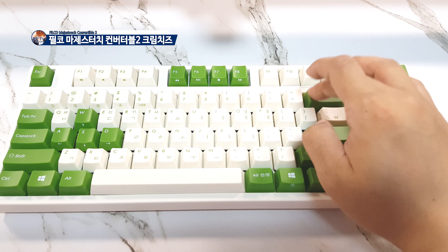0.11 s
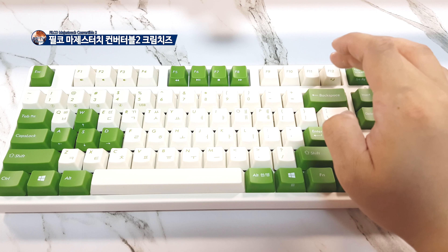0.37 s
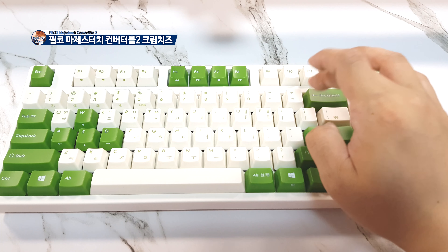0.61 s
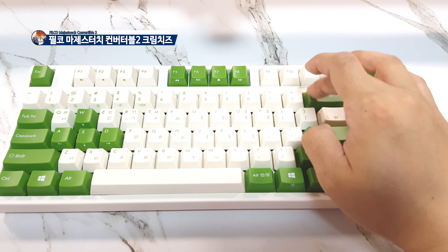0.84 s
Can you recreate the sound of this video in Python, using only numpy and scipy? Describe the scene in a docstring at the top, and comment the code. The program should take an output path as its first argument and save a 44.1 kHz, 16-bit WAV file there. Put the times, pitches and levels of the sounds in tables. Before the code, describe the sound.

Evenly spaced single mechanical key presses clack and spring back over a hollow case, switching to a sharper-sounding key after a short gap.

```python
"""In a quiet humming room, one finger taps a wide key of a mechanical keyboard about five times a second,
then moves to another wide key. Each stroke is a fingertip touch, a hard bottom-out and a spring-back clack,
with rubbing and loose rattles while the key is held. Contacts are shaped noise ringing cap and stem resonances;
blows ring decaying modes of the hollow case and of the desk, which shakes the phone standing on it."""
import sys
import numpy as np
from scipy import signal
from scipy.fft import rfft, irfft
from scipy.io import wavfile

SR = 44100
rng = np.random.default_rng(int(sys.argv[2]) if len(sys.argv) > 2 else 0)


def pcm_store(signal):
    """Save signal as 16-bit PCM."""
    levels = np.round(np.clip(np.atleast_2d(signal), -1, 1) * 32767)
    wavfile.write(sys.argv[1], SR, levels.astype(np.int16).T)


def volts_from_decibels(level):
    """Turn decibel levels (scalar or array-like) into linear amplitude factors."""
    exponent = np.asarray(level, float) / 20
    return 10 ** exponent


N = 304731
SECOND_KEY_S = 3.2  # strokes after this time fall on the second key


def key_of(s):
    """Source position: 0 for strokes on the first key, 1 for the second."""
    return (np.asarray(s) > SECOND_KEY_S).astype(int)


def fade(t, t60):
    """Exponential decay: the level falls by 60 dB in t60 seconds."""
    return np.exp(-np.log(1000) * t / t60)


def resonate(x, peaks):
    """Resonance: two-pole bands (frequency [Hz], width [Hz], level [dB]) summed with alternating sign."""
    f = np.fft.rfftfreq(x.shape[-1], 1 / SR) + 1e-3
    response = 0
    for k, (hz, width, db) in enumerate(peaks):
        response = response + (-1) ** k * volts_from_decibels(db) / (1 + 1j * (f * f - hz * hz) / (f * width))
    return irfft(rfft(x) * response, x.shape[-1])


def add(out, x, s):
    """Superposition: mix x into out from time s."""
    i = int(s * SR)
    x = x[..., max(-i, 0):N - i]
    out[..., max(i, 0):max(i, 0) + x.shape[-1]] += x


# background spectrum in mid: (frequency [Hz], relative density [dB per Hz])
HUM_SPECTRUM = [(25, 16.5), (45, 4.5), (92, 0), (150, 2.5), (250, 5.5), (290, 10), (373, 0.5), (463, 2.5),
                (600, -3), (1200, -6), (2100, -12.5), (2750, -20), (5500, -29), (16000, -32.5)]
# spread of the background: (frequency [Hz], side minus mid [dB])
HUM_SIDE = [(60, -2.5), (200, -7), (1300, -6.5), (4400, -3), (15000, 2.5)]


def hum():
    """Stationary noise: the room's steady background and the microphone's hiss, as filtered white noise."""
    log_f = np.log(np.fft.rfftfreq(N, 1 / SR) + 1)
    mid_hz, mid_db = np.transpose(HUM_SPECTRUM)
    side_hz, side_db = np.transpose(HUM_SIDE)
    mid_db = np.interp(log_f, np.log(mid_hz), mid_db)
    side_db = mid_db + np.interp(log_f, np.log(side_hz), side_db)
    noise = irfft(rfft(rng.standard_normal((2, N))) * volts_from_decibels([mid_db, side_db]), N)
    return noise * volts_from_decibels(-51) / noise[0].std()  # rms of mid


def grit(shape, rough_db):
    """Asperity contact: noise whose size jumps every half millisecond, as from many tiny contacts."""
    size = np.repeat(rng.standard_normal(shape[-1] // 24 + 1), 24)[:shape[-1]]
    return rng.standard_normal(shape) * volts_from_decibels(rough_db * size)


# cap resonances, one list per key:
# (frequency [Hz], width [Hz], level on a press [dB], level on other contacts [dB])
CAPS = [
    [(1868, 124, 0.5, 5), (3082, 363, 3.5, 8.5), (3240, 710, 1.5, 5), (4470, 840, -9, -3.5)],
    [(1708, 406, 1.5, 11), (2046, 1230, -6, -1), (2804, 384, -5, 7.5), (3720, 904, -13, 3.5),
     (4630, 820, -13, -1)],
]
# stem resonances, the treble: (frequency [Hz], width [Hz], level on first key [dB], on second key [dB])
STEM = [(5870, 3200, -13, -3), (8120, 930, -5.5, 0.5), (9470, 1250, -5.5, 0.5), (13530, 3600, -5.5, -13),
        (14900, 8400, -11.5, -27)]


def contact(s, push, column, peak_db, treble_db, rough_db=1.0):
    """Forced resonance: noise shaped by push rings the cap and stem of the key in use; mid and side."""
    key = int(key_of(s))
    noise = grit((4, len(push)), rough_db) * push
    # the finger damps and detunes the cap differently each time
    detune, colour_db = 1 + 0.042 * rng.standard_normal(5), 1.1 * rng.standard_normal(5)
    cap_peaks = [(c[0] * d, c[1], c[column] + e) for c, d, e in zip(CAPS[key], detune, colour_db)]
    cap = resonate(noise[:2], cap_peaks)
    stem = resonate(noise[2:], [(c[0], c[1], c[2 + key]) for c in STEM])
    cap = cap / np.abs(cap[0]).max()
    stem = volts_from_decibels(treble_db) * stem / np.abs(stem[0]).max()
    # the key sits nearer the left port; the treble reaches the ports less alike
    mid = cap[0] + stem[0]
    unlike_treble = signal.lfilter([1, -.7], 1, stem[1])
    side = 0.24 * cap[0] + 0.21 * cap[1] + .07 * stem[0] + 0.48 * unlike_treble
    return volts_from_decibels(peak_db) * np.array([mid, side])


def follow(events, column, law):
    """Proportionality: a level follows one column of the events by a straight law, offset by key."""
    rows = np.array(events, float)
    usual_db = -30  # the cause at which the law's offsets hold
    return np.where(key_of(rows[:, 0]) == 1, law[1], law[0]) + law[2] * (rows[:, column] - usual_db)


def bright(events, column, law):
    """Spectral tilt with force: rows (time [s], cap peak [dB], treble [dB]), the treble by law and chance."""
    treble_db = follow(events, column, law) + 1.5 * rng.standard_normal(len(events))
    return np.c_[np.array(events)[:, :2], treble_db]


def clicks(events, column, rise_s, crack_s, abrupt, tail_db, tail_s, swell_db, swell_s):
    """Impact: a crack, its length set by key, with a rattling tail; a faint noise swells just before it."""
    out, lead_s = np.zeros((2, N)), .024
    t = np.arange(8192) / SR - lead_s
    after = np.maximum(t, 0)
    for s, peak_db, treble_db in events:
        crack = np.exp(-(after / crack_s[int(key_of(s))]) ** abrupt)
        tail = volts_from_decibels(tail_db) * fade(after, tail_s)
        swell = volts_from_decibels(swell_db) * (t < 0) * (1 + t / lead_s) * np.exp(np.minimum(t, 0) / swell_s)
        push = (1 - np.exp(-after / rise_s)) * (crack + tail) + swell
        add(out, contact(s, push, column, peak_db, treble_db), s - lead_s)
    return out


# fingertip lands on the cap: (time [s], click level [dB])
TOUCH = [(0.0139, -30), (0.6664, -22), (0.8644, -29), (1.046, -29), (1.2507, -32.5), (1.428, -35),
         (1.6269, -29), (1.811, -29), (1.9983, -30.5), (2.1749, -28), (2.3635, -29.5), (2.574, -33),
         (2.776, -28.5), (3.538, -29.5), (3.736, -29), (3.9538, -30.5), (4.148, -30), (4.3357, -31),
         (4.5226, -37), (4.7201, -36.5), (4.915, -38), (5.1014, -37.5), (5.3151, -32), (5.5449, -30.5),
         (6.0998, -29), (6.303, -34), (6.5126, -33.5), (6.7, -33.5)]
# treble over click, from click level: (first key [dB], second key [dB], slope [dB per dB])
TOUCH_TREBLE = (-11, -6.5, -0.1)


def touch():
    """Soft impact: the fingertip lands on the cap."""
    return clicks(bright(TOUCH, 1, TOUCH_TREBLE), column=3, rise_s=0.0002, crack_s=(.0035, .004),
                  abrupt=2.6, tail_db=-15.5, tail_s=0.18, swell_db=-16, swell_s=0.0022)


def travel():
    """Sliding friction: from touch to bottom-out the stem hisses, bright and grainy, in its housing."""
    out, t = np.zeros((2, N)), np.arange(4096) / SR
    for (start, click_db), (end, *_) in zip(TOUCH, PRESS):
        push = np.minimum(t / 0.0052, 1) * (t < end - start)
        hiss = contact(start, push, column=3, peak_db=0.57 * click_db - 28, treble_db=-1.0, rough_db=4.0)
        add(out, hiss, start)
    return out


def body(modes, angles, times, gains_db, length_s, rise_s, side_lag_s, scatter_db, detune):
    """Modal superposition: modes swell and decay after each blow, weighted and tuned a little anew."""
    out, t = np.zeros((2, N)), np.arange(int(length_s * SR)) / SR
    chance = rng.standard_normal((len(times), 2, len(modes)))
    decay = fade(t, modes[:, 1:]) * (1 - np.exp(-t / rise_s))
    for s, db, (loud, sharp) in zip(times, gains_db, chance):
        hz = modes[:, 0] * (1 + detune * sharp)
        rings = decay * np.sin(2 * np.pi * hz[:, None] * t)
        gain = volts_from_decibels(db + scatter_db * loud)
        add(out[0], gain * np.cos(angles) @ rings, s)
        add(out[1], gain * np.sin(angles) @ rings, s + side_lag_s)
    return out


# desk top modes: (frequency [Hz], t60 [s], level from first key [dB], from second key [dB],
# added on release [dB])
DESK = [(25.96, 1, -5, -31, -9.5), (42.24, 0.61, 0.5, 5, -20.5), (61.7, 0.26, -9, -24, -12),
        (82.8, 0.27, -9, -2, -18.5), (104, 0.51, -20.5, -6.5, -41), (114.2, 0.055, -8.5, 4, -8.5),
        (141, 0.25, -0.5, 3.5, -17), (178, 0.086, -1.5, -2.5, -6), (195.5, 0.2, -4.5, -2, -13.5),
        (214, 0.043, -2.5, -9, 4), (232.7, 0.34, -11, -6, -2.5), (258.2, 0.34, -5.5, -5, -3)]
# how far each desk mode rocks the phone sideways instead of up and down: (angle [degrees]);
# past 180 it moves against the blow
ROCK = [195, -13, -50, 32, 50, 15, 232, 20, 194, 20, 52, 78]
# desk blow, from click level: (first key [dB], second key [dB], slope [dB per dB])
TOUCH_DESK = (-44, -45.5, 0.29)
# desk blow, from case blow: (first key [dB], second key [dB], slope [dB per dB])
PRESS_DESK = (-30, -32.5, 0.25)


def desk():
    """Action and reaction: touch and press drive the desk down; the rebound pulls it up, rebalanced in pitch."""
    modes, press, release = (np.array(a, float) for a in (DESK, PRESS, RELEASE))
    by_key = modes[:, 2:4].T[key_of(press[:, 0])]
    angles, lag_s = np.radians(ROCK), .001
    touch_db = follow(TOUCH, 1, TOUCH_DESK)[:, None] + by_key
    press_db = follow(PRESS, 2, PRESS_DESK)[:, None] + by_key
    release_db = follow(RELEASE, 1, RELEASE_CASE)[:, None] + 5 + by_key + modes[:, 4]
    down = body(modes[:, :2], angles, np.array(TOUCH)[:, 0], touch_db, length_s=0.3, rise_s=0.0028,
                side_lag_s=lag_s, scatter_db=3.0, detune=0.03)
    down += body(modes[:, :2], angles, press[:, 0] + 0.00434, press_db, length_s=0.93, rise_s=0.00089,
                 side_lag_s=lag_s, scatter_db=1, detune=0.023)
    up = body(modes[:, :2], angles, release[:, 0] + 0.0035, release_db, length_s=0.28, rise_s=0.0054,
              side_lag_s=lag_s, scatter_db=3.54, detune=0.018)
    return up - down


# hollow case modes: (frequency [Hz], t60 [s], level from first key [dB], from second key [dB])
CASE = [(360, 0.0092, -8, -4), (452, 0.16, -14, -7.5), (464, 0.054, -1, 1.5), (521, 0.036, -5.5, 4),
        (574, 0.11, -10, -3.5), (660.3, 0.1, -8.5, -13), (764.4, 0.025, 5, -0.5), (828.7, 0.066, -6, 1),
        (926, 0.019, 4, -10), (1029, 0.019, 1, 3.5), (1078, 0.041, -3.5, -0.5), (1272, 0.088, -14, -24),
        (1402, 0.03, -7.5, -43.5)]
# case blow, from click level: (first key [dB], second key [dB], slope [dB per dB])
TOUCH_CASE = (-42, -47.5, 0.34)
RELEASE_CASE = (-30.5, -37.5, 0.66)


def case():
    """Free vibration: touch, press and release ring the hollow case; its low modes spread wider."""
    modes, press, release, touches = (np.array(a, float) for a in (CASE, PRESS, RELEASE, TOUCH))
    times = np.r_[press[:, 0], release[:, 0], touches[:, 0]]
    blow_db = np.r_[press[:, 2], follow(RELEASE, 1, RELEASE_CASE), follow(TOUCH, 1, TOUCH_CASE)]
    gains_db = blow_db[:, None] + modes[:, 2:].T[key_of(times)]
    angles = np.clip(0.59 * (440 / modes[:, 0]) ** 2.9, 0, 1)  # radians from mid towards side
    return body(modes[:, :2], angles, times + 0.0011, gains_db, length_s=0.1, rise_s=0.0024,
                side_lag_s=0, scatter_db=2.0, detune=0.02)


def room(dry, t60, wet_db):
    """Diffuse reverberation: a short tail of decaying noise, unrelated in mid and side, weak in bass."""
    t = np.arange(int(.4 * SR)) / SR
    tail = rng.standard_normal((2, len(t))) * fade(t, t60) * (t > .004)
    tail = resonate(tail, [(1570, 8600, 0)])
    tail = tail / np.sqrt(np.sum(tail ** 2, axis=1, keepdims=True))
    wet = signal.fftconvolve(dry[:1], tail, axes=1)[:, :N]
    return volts_from_decibels(wet_db) * np.array([[1], [.6]]) * wet


# key bottoms out: (time [s], click level [dB], case blow [dB])
PRESS = [(0.0349, -22.5, -24.5), (0.6807, -21.5, -25.5), (0.8896, -22, -32.5), (1.07, -25.5, -28.5),
         (1.276, -25.5, -33.5), (1.4521, -30, -31), (1.652, -26, -30), (1.837, -29, -33.5),
         (2.0219, -31.5, -32), (2.2011, -27.5, -31.5), (2.389, -27.5, -32), (2.5997, -23, -28.5),
         (2.7957, -27.5, -24.5), (3.5604, -18.5, -35), (3.7608, -20, -34.5), (3.9793, -23, -34),
         (4.168, -18, -31), (4.362, -25.5, -36), (4.55, -25.5, -38), (4.749, -32, -41.5),
         (4.9398, -25.5, -39), (5.1262, -26.5, -36.5), (5.3344, -17, -32), (5.5628, -15.5, -32),
         (6.1229, -17, -35), (6.3249, -16.5, -31), (6.5332, -20, -32.5), (6.7264, -19, -36.5)]
# treble over click, from case blow: (first key [dB], second key [dB], slope [dB per dB])
PRESS_TREBLE = (-7.5, -7, 0.25)


def bottom_out():
    """Hard impact: the key strikes the bottom of its travel."""
    return clicks(bright(PRESS, 2, PRESS_TREBLE), column=2, rise_s=0.00029, crack_s=(.002, .0013),
                  abrupt=1.1, tail_db=-33.5, tail_s=0.22, swell_db=-33.5, swell_s=0.024)


def scrape():
    """Friction noise: while the key is held and rises, finger, spring and stem rub more and more."""
    out, t = np.zeros((2, N)), np.arange(8192) / SR
    for (start, *_), (end, click_db) in zip(PRESS, RELEASE):
        held = np.clip(t / (end - start), 0, 1)
        push = volts_from_decibels(-12 * (1 - held)) * np.minimum(held / 1.4, 1) * (held < 1)
        push = push * volts_from_decibels(2.8 * np.repeat(rng.standard_normal(32), 256))  # it comes in fits of a few ms
        rub = contact(start, push, column=3, peak_db=.5 * click_db - 30.0, treble_db=-3, rough_db=7.0)
        add(out, rub, start)
    return out


# loose cap and wire tick within a stroke, mostly shortly before the key springs back:
# (time [s], click level [dB], treble over click [dB])
RATTLE = [(0.0883, -43, -3), (0.728, -56, 12), (0.9296, -52, 8), (0.966, -42.5, 1), (1.1198, -57, 13),
          (1.1479, -37, -3), (1.2685, -29.5, -10), (1.314, -31, -9), (1.3263, -37, -8), (1.5049, -59, 7),
          (1.5285, -39, -15), (1.7184, -43, -7), (1.906, -40, 4), (2.09, -41, -6), (2.6568, -37.5, 2.5),
          (2.8622, -43, -4), (3.6315, -46, 1), (3.8293, -34, -7), (4.6145, -40, -19), (4.792, -40.5, -9),
          (4.985, -43, -20), (5.1725, -43, -9), (5.1979, -36, -15), (6.1917, -37, -1), (6.595, -42, -5),
          (6.6067, -37, -20), (6.7716, -49, -24), (6.8064, -32, -27)]


def rattle():
    """Secondary impacts: loose cap and wire tick within strokes, mostly shortly before the spring-back."""
    return clicks(RATTLE, column=3, rise_s=0.00046, crack_s=(.003, .003), abrupt=1.5,
                  tail_db=-10.5, tail_s=.15, swell_db=-18, swell_s=0.0043)


# key springs back against its top stop: (time [s], click level [dB])
RELEASE = [(0.112, -29.5), (0.784, -34.5), (0.9799, -34), (1.1587, -29.5), (1.3475, -31), (1.5462, -32.5),
           (1.7375, -32), (1.925, -33), (2.1085, -36), (2.2882, -37.5), (2.4763, -36.5), (2.6746, -31.5),
           (2.8741, -29.5), (3.655, -25.5), (3.8456, -25.5), (4.0585, -19), (4.2549, -24), (4.4545, -27.5),
           (4.6388, -24.5), (4.833, -26.5), (5.026, -24.5), (5.2113, -25.5), (5.4216, -22), (5.6326, -23),
           (6.2023, -22.5), (6.4157, -26.5), (6.6208, -24.5), (6.8221, -22.5)]
# treble over click, from click level: (first key [dB], second key [dB], slope [dB per dB])
RELEASE_TREBLE = (-4.5, -14.5, 0.092)


def spring_back():
    """Elastic recoil: the spring throws the key against its top stop."""
    return clicks(bright(RELEASE, 1, RELEASE_TREBLE), column=3, rise_s=0.00014, crack_s=(.005, .003),
                  abrupt=1.24, tail_db=-32.5, tail_s=0.16, swell_db=-26, swell_s=0.05)


def scene():
    """Superposition: all parts summed in mid and side, then turned to left and right."""
    keys = touch() + travel() + case() + bottom_out() + scrape() + rattle() + spring_back()
    mid, side = hum() + keys + room(keys, t60=0.22, wet_db=-16.5) + desk()
    return np.array([mid + side, mid - side])


def roll_off(x):
    """The treble ends steeply here."""
    return signal.sosfilt(signal.butter(12, 16800, fs=SR, output="sos"), x)


def record(dry):
    """Low-pass response: the microphone rolls off the top."""
    soft = signal.sosfilt(signal.butter(4, 15500, fs=SR, output="sos"), dry)
    return roll_off(soft)


dry = scene()
out = record(dry)
pcm_store(out)
```